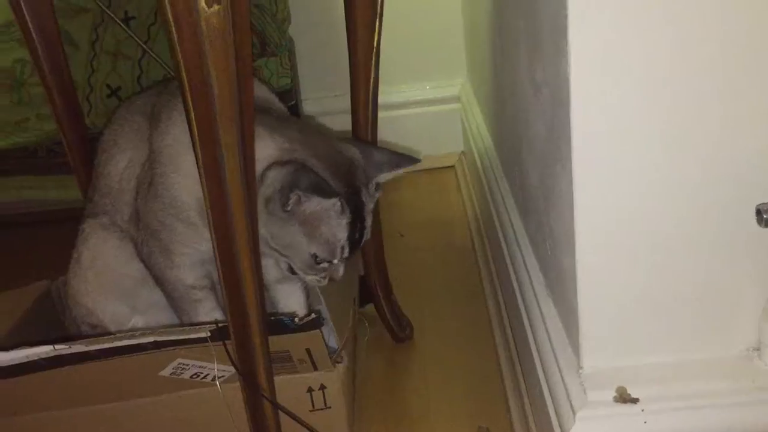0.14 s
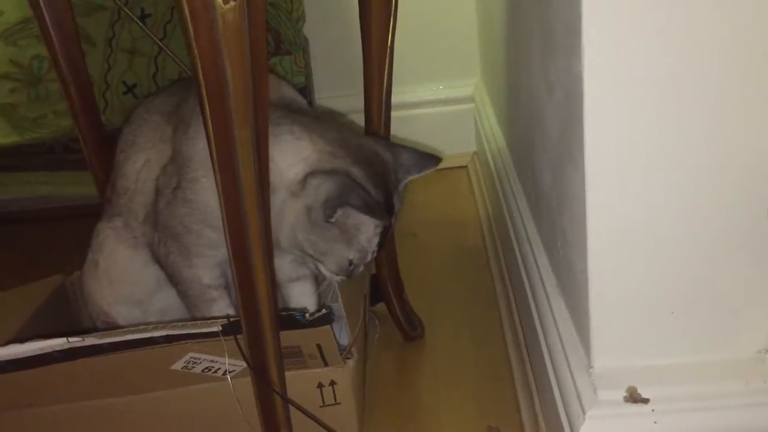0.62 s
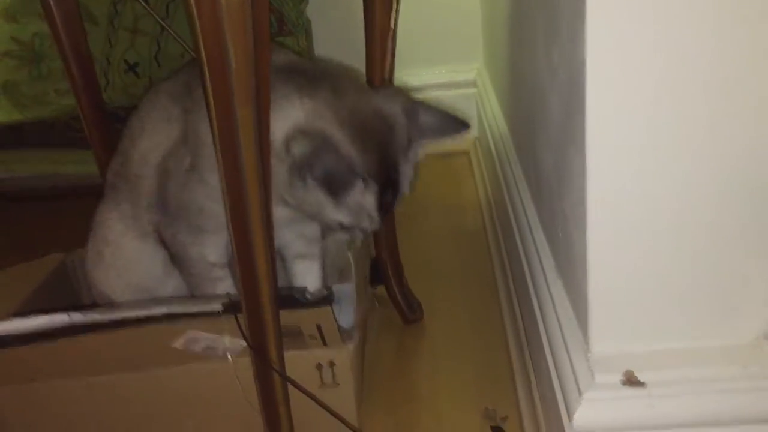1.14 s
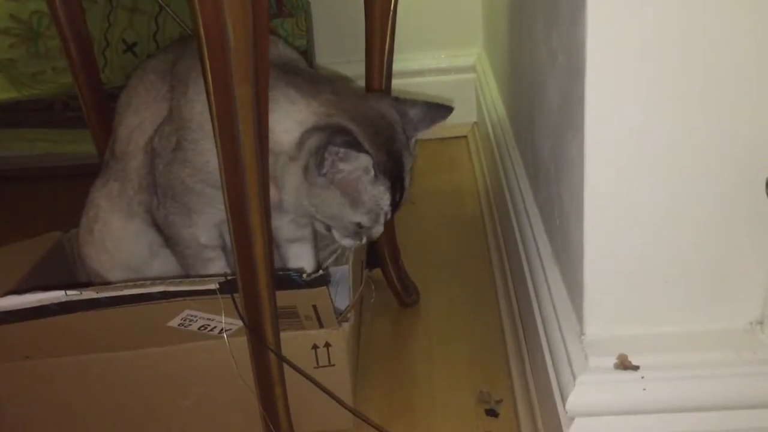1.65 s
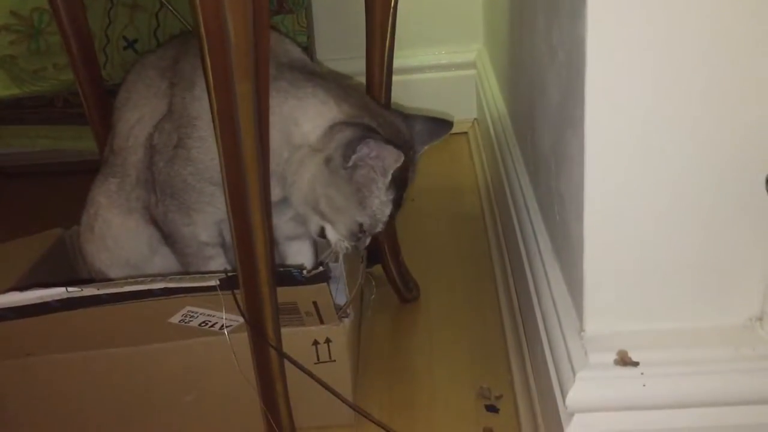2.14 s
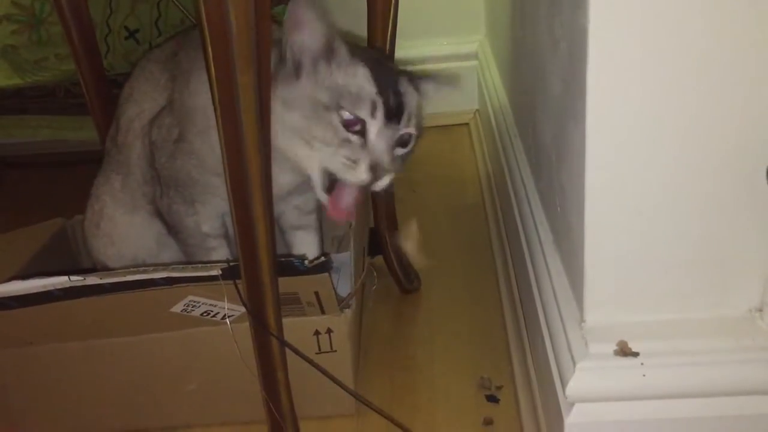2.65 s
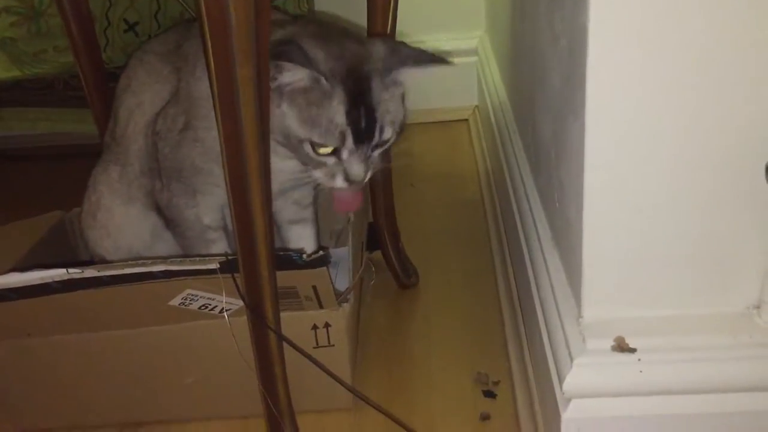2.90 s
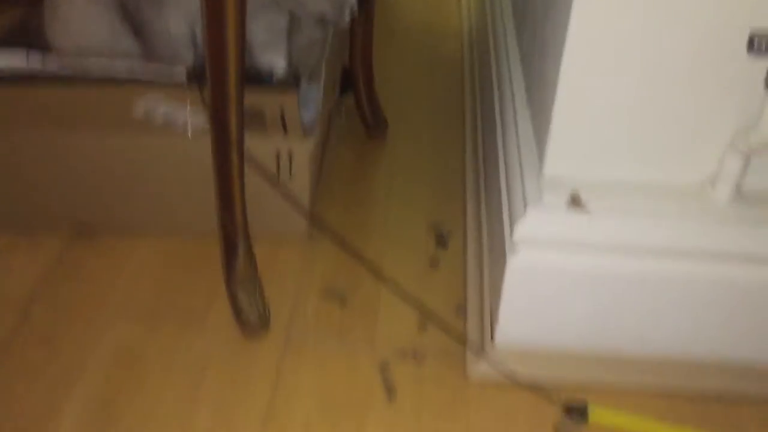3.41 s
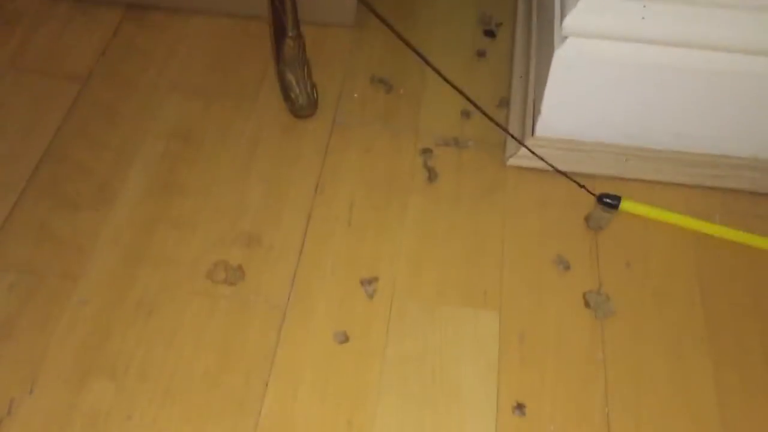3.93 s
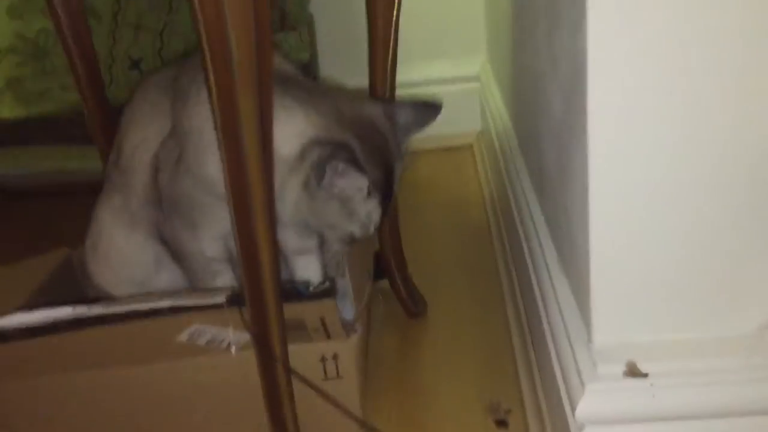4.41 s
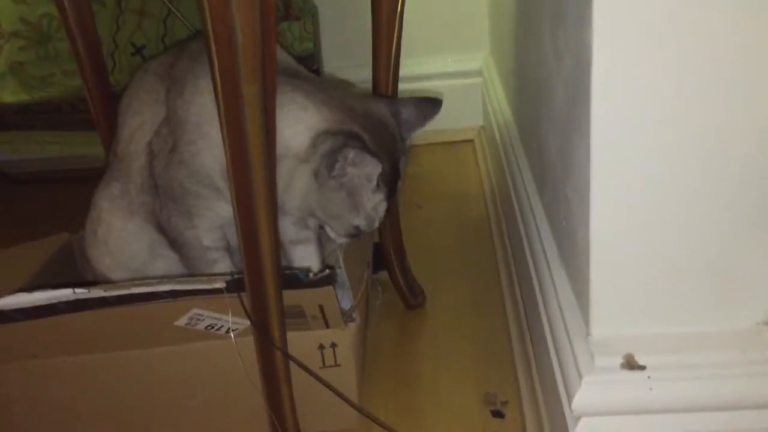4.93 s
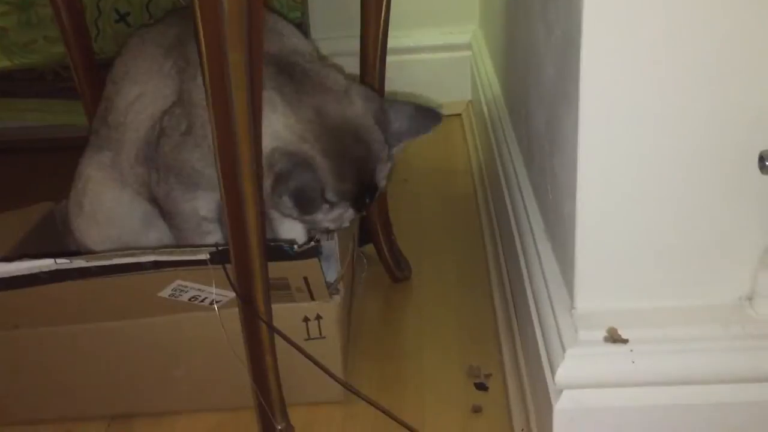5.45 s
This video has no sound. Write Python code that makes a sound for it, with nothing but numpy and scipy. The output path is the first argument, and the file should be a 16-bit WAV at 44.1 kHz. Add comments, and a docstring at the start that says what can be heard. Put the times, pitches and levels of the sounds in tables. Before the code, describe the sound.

Close, dry sounds of teeth on corrugated board: light papery crackle first, then sharper woody snaps with brief hollow ringing. After a short lull, denser tearing and thumping peaks about halfway through. It thins to a few ticks and soft nudges over low room noise, until a hard knock starts another bout of bites and ripping. Small indoor room, modest microphone.

```python
"""A cat bites and tugs at the flap of a corrugated cardboard box in a small quiet room, over faint rumble and hiss.
A jolt opens; to 2.75 s tears, bites, ticks, nudges and two-panel rings come in busy bouts, with a pause
from 1.3 to 1.75 s, then thin out. A faint rustle passes at 3.55 s; from 4.7 s biting and tearing return until 5.6 s.
Shaped noise bursts and clumped, uneven fibre noise drive resonances of walls, hollow and paper; decaying noise
adds the room."""
import sys
import numpy as np
from scipy import signal
from scipy.fft import rfft, irfft, next_fast_len
from scipy.io import wavfile
from scipy.ndimage import uniform_filter1d, map_coordinates

SR = 44100
rng = np.random.default_rng(int(sys.argv[2]) if len(sys.argv) > 2 else 0)


def bounce(signal):
    """Save signal as a 16-bit WAV file at the path given by the first command-line argument."""
    frames = np.transpose(np.atleast_2d(signal))
    limited = np.clip(frames, -1, 1)
    pcm = np.round(limited * 32767).astype(np.int16)
    wavfile.write(sys.argv[1], SR, pcm)


def makeup_ratio(level_db):
    """Linear amplitude ratio for a level in decibels (20 dB per factor of ten)."""
    decades = np.asarray(level_db, float) / 20
    return 10 ** decades


N = 245107
SPAN = 8192  # samples for one event

# bites and snaps: (time [s], knock level [dB], crackle over knock [dB], favoured pitch of the gripped flap [Hz])
BITE_EVENTS = [(0.137, -38.5, 3, 1170), (0.16, -45, -14, 1150), (0.288, -54, 5, 1000),
               (0.314, -48, -9, 504), (0.377, -65, -8, 910), (0.43, -42.5, -0.5, 1860),
               (0.445, -47, 3, 1060), (0.488, -46, -11, 1750), (0.54, -43, -13, 1200),
               (0.553, -42.5, -3.5, 1140), (0.614, -46, -9, 1130), (0.657, -39.5, -18, 523),
               (0.669, -32, -6, 540), (0.69, -37, -5, 517), (0.702, -41, -1, 530),
               (0.778, -31.5, -14.5, 587), (0.801, -49, -2, 533), (0.825, -40.5, -15, 510),
               (0.843, -37, -24, 880), (1.033, -26.5, -20, 600), (1.049, -58, -25, 1200),
               (1.164, -41, -4.5, 1310), (1.178, -33, -12, 1120), (1.2269, -28, -40, 630),
               (1.26, -40.5, -41, 530), (1.748, -56.5, -8, 1340), (1.8415, -30, -25, 730),
               (2.045, -34, -5.5, 705), (2.058, -37.5, -10, 1060), (2.092, -30.5, -6.5, 1070),
               (2.155, -46, -4, 1500), (2.167, -41, -3, 505), (2.227, -39, -3.5, 1670),
               (2.255, -36.5, -4.5, 553), (2.348, -41, -18, 1170), (2.386, -47, -1, 560),
               (2.477, -37, -3, 550), (2.493, -36.5, -6.5, 1080), (2.525, -32, -17, 574),
               (2.535, -32.5, -9, 550), (2.549, -24, -11.5, 1090), (2.555, -29.5, -16, 1150),
               (2.574, -39.5, -3, 1010), (2.619, -23.5, -24.5, 617), (2.679, -33, -42, 670),
               (2.72, -45.5, -13, 670), (3.879, -68, 4, 1260), (4.686, -32.5, -29, 670),
               (4.757, -46.5, -8, 520), (4.771, -52, -3.5, 1600), (4.794, -23, -22.5, 670),
               (4.859, -34, -21, 1050), (5.008, -31.5, -6, 1050), (5.022, -36, -22, 720),
               (5.076, -34.5, -5.5, 1160), (5.094, -37.5, -6, 483), (5.19, -45, -8, 510),
               (5.201, -41.5, -2.5, 716), (5.238, -47, -9, 1310), (5.25, -46, 2, 1120),
               (5.304, -47, -1, 530), (5.392, -55, 5, 550), (5.42, -53, 0, 1790), (5.439, -51.5, -8, 1340),
               (5.511, -54.5, -2, 1090), (5.531, -51, 1, 1100)]
# box wall resonances: (frequency [Hz], width [Hz], level [dB])
WALL_MODES = [(557.7, 39, -1.5), (670, 74, -2.5), (812, 92, -4), (961, 80, -1), (1120, 108, -1.5),
              (1279, 73, -1.5), (1389, 61, -3.5), (1588, 94, -4), (1817, 84, -2), (2138, 120, -7.5),
              (2327, 92, -7), (2525, 101, -7.5), (2793, 94, -11), (3037, 112, -9), (3626, 360, -14.5),
              (4200, 110, -20), (4490, 67, -17.5), (5550, 1440, -18), (7130, 2730, -22)]
# air and panels of the hollow box: (frequency [Hz], width [Hz], level [dB])
HOLLOW_MODES = [(70.4, 100, -12), (99.3, 60.4, -1), (125, 25.7, 1), (203.4, 52, -5), (245.5, 36, -2),
                (347.4, 44, -0.5), (403.8, 32.5, -1), (494, 88, -1)]
# thin paper layers: (frequency [Hz], width [Hz], level [dB])
PAPER_MODES = [(4260, 310, -3.5), (5310, 400, -8.5), (6670, 260, -8), (8170, 480, -3), (8840, 1900, 0),
               (9830, 1600, 1.5), (11130, 370, 2), (12040, 570, 0.5), (13370, 380, 2.5), (14800, 910, -4),
               (14200, 310, -16), (15300, 720, -7)]


def unit(x):
    """Scaled to rms 1."""
    return x / np.sqrt(np.mean(x ** 2) + 1e-20)


def peaked(x):
    """Scaled so that its loudest 2 ms have the rms of a sine of peak 1."""
    return x / np.sqrt(2 * np.max(uniform_filter1d(x * x, size=88)))


def along(points, hz):
    """(Hz, value) points interpolated on a log frequency axis."""
    f, v = np.transpose(points)
    return np.interp(np.log(hz + 1), np.log(f + 1), v)


def wobble(rate_hz):
    """A smooth random curve, rate_hz knots a second."""
    knots = rng.standard_normal(int(N * rate_hz / SR) + 4)
    return map_coordinates(knots, [np.arange(N) * rate_hz / SR])


def filtered(x, response):
    """x through a complex response of frequency."""
    m = next_fast_len(len(x) + 8192)
    return irfft(rfft(x, m) * response(np.fft.rfftfreq(m, 1 / SR)), m)[:len(x)]


def body(modes, scatter_db=0):
    """Causal sum of resonances; scatter_db weights them anew for each contact point."""
    centre, width, db = np.transpose(modes)[:, :, None]
    sign = (-1.) ** np.arange(len(modes))[:, None]
    gain = makeup_ratio(db + scatter_db * rng.standard_normal(db.shape)) * sign

    def response(f):
        damping = 1j * f * width
        return np.sum(gain * damping / (centre * centre - f * f + damping), axis=0)
    return response


def favour(f, hz, octaves, db):
    """Where the box is touched decides which modes speak: a gain bump round hz."""
    return makeup_ratio(db * np.exp(-(np.log2((f + 1) / hz) / octaves) ** 2))


def fibres(size, spiky_db):
    """Noise whose samples have long-tailed sizes: many small breaks, a few big ones."""
    return rng.standard_normal(size) * makeup_ratio(spiky_db * rng.exponential(size=size))


def patchy(x, depth_db):
    """The tear moves along the flap, so its colour shifts in patches about 500 Hz by 30 ms."""
    z = signal.stft(x, nperseg=256)[2]
    field = uniform_filter1d(rng.standard_normal(z.shape), size=3, axis=0)
    field = uniform_filter1d(field, size=10, axis=1)
    return unit(signal.istft(z * makeup_ratio(depth_db * unit(field)), nperseg=256)[1][:N])


def hush():
    """Room rumble and microphone hiss: coloured noise, its level wavering a little."""
    # noise spectrum: (frequency [Hz], relative level per Hz [dB])
    hush_colour = [(15, -72), (25, -7), (53, 3), (149, -5), (191, -8), (237, -10), (319, -12), (386, -12.5),
                   (418, -14), (681, -19), (893, -18.5), (1380, -21), (1710, -19.5), (3650, -23.5),
                   (16200, -31)]
    noise = unit(filtered(rng.standard_normal(N), lambda hz: makeup_ratio(along(hush_colour, hz))))
    return makeup_ratio(-66.5 + 0.6 * wobble(3.74)) * noise


def jolts():
    """A blunt blow and a ragged shove thump the hollow, at jolts of the whole box and at every bite."""
    # jolts: (time [s], level [dB], favoured pitch [Hz])
    jolt_events = [(0.002, -34.5, 140), (0.14, -46.5, 404), (0.305, -41.5, 375), (0.325, -46, 122),
                   (0.545, -37, 340), (0.68, -37, 350), (0.785, -38, 290), (0.916, -40.5, 347),
                   (1.049, -44, 110), (1.163, -39, 260), (1.171, -29, 272), (1.193, -39, 95),
                   (1.24, -42, 100), (1.847, -39, 100), (1.948, -36.5, 334), (1.955, -42, 119),
                   (1.974, -32.5, 120), (1.993, -38.5, 120), (2.047, -44, 110), (2.091, -32.5, 260),
                   (2.164, -34, 250), (2.253, -32.5, 260), (2.381, -37, 332), (2.531, -21, 224),
                   (2.553, -22.5, 404), (2.561, -23.5, 100), (2.574, -35, 100), (2.905, -49, 204),
                   (3.878, -54.5, 275), (4.191, -46, 126), (4.203, -49.5, 328), (4.767, -31.5, 117),
                   (4.79, -31, 100), (4.869, -31, 133), (4.874, -31.5, 370), (5.076, -27, 220),
                   (5.095, -30, 179), (5.175, -46, 141), (5.291, -41.5, 316)]
    thump_db, thump_hz, thump_s = -4, 351, 0.0019  # at bites: over the knock, pitch, push decay
    out, t = np.zeros(N + SPAN), np.arange(SPAN) / SR
    hollow = body(HOLLOW_MODES)
    pushes = [(s, db, hz, 1 / hz) for s, db, hz in jolt_events]  # decay of one period
    pushes += [(s, db + thump_db, thump_hz, thump_s) for s, db, *_ in BITE_EVENTS]
    for s, db, hz, decay_s in pushes:
        shove = (1 - np.exp(-t / 0.004)) * np.exp(-t / decay_s) * rng.standard_normal(SPAN)
        blow = np.exp(-((t - 0.0022) / 0.00096) ** 2)
        push = unit(shove) + 0.38 * unit(blow)
        thump = filtered(push, lambda f: hollow(f) * favour(f, hz, 0.54, 12.2))
        out[round(s * SR):][:SPAN] += makeup_ratio(db) * peaked(thump)
    return out[:N]


def room(x):
    """Decaying noise as echo: each frequency dies at its own speed; a new tail every 0.19 s."""
    # reverberation: (frequency [Hz], t60 [s])
    room_t60 = [(100, 0.17), (600, 0.27), (1500, 0.22), (4000, 0.2), (12000, 0.15)]
    out, step = np.zeros(N + SR), 8192
    for k in range(0, N, step):
        hz, t, z = signal.stft(rng.standard_normal(SR // 2), SR, nperseg=256)
        decay = makeup_ratio(-60 * t / along(room_t60, hz)[:, None])
        tail = signal.istft(z * decay, SR, nperseg=256)[1]
        wet = signal.fftconvolve(x[k:k + step], tail / np.linalg.norm(tail))
        out[k + 200:][:len(wet)] += wet  # 4.5 ms predelay
    return out[:N]


def tearing():
    """Fibres part in clumps of a few ms that creak in the walls, sway the hollow and rip in the paper."""
    # pull that swells and fades, one list a tear: (time [s], rip level [dB], stiff board over paper [dB])
    tears = [
        [(0.12, -65, -10), (0.145, -56.5, 6.5), (0.2, -80.5, 13)],
        [(0.275, -72, -10), (0.3, -58.5, 0.5), (0.345, -70, 5.5)],
        [(0.42, -65, 5), (0.46, -55, 1.5), (0.52, -61, 4.5), (0.56, -58.5, 7), (0.585, -66, -4),
         (0.64, -61.5, 3.5), (0.706, -58.5, 3), (0.74, -57, 3.5), (0.834, -54, 4), (0.87, -82, 9)],
        [(2.04, -65.5, 5), (2.15, -66, 6.5), (2.16, -65.5, -1), (2.215, -57.5, -1), (2.264, -52.5, 2.5),
         (2.346, -55.5, 1.5), (2.4, -54, -1), (2.464, -58, 1.5), (2.49, -46.5, 0.5), (2.55, -43.5, 3),
         (2.606, -77, 16)],
        [(5.16, -67, 1), (5.21, -62, 10), (5.235, -65.5, -0.5), (5.285, -60, 2), (5.305, -58, 3),
         (5.38, -59.5, 1.5), (5.42, -55, -1), (5.49, -61, -1.5), (5.558, -53, -13.5)],
    ]
    # the box rocks and settles: (start [s], length [s], level [dB], creak over sway [dB])
    rocking = [(0.846, 0.18, -60, -11), (1.954, .09, -57.5, -11.5), (2.59, 0.17, -49.5, -24),
               (4.193, .15, -70, -17), (4.76, 0.23, -55, -8.5)]
    settle_db = 8  # lost over one rocking
    snap_db, snaps_per_s = -9.5, 250  # single fibres, over the rip
    t, out = np.arange(N) / SR, np.zeros(N)
    clumps_db = 2.2 * wobble(45) + 2.2 * wobble(220)

    creak = filtered(makeup_ratio(clumps_db) * fibres(N, spiky_db=1.6), body(WALL_MODES))
    creak = patchy(creak, depth_db=1.7)
    sway_db = 0.41 * clumps_db + 2.4 * wobble(24)
    sway = unit(filtered(makeup_ratio(sway_db) * rng.standard_normal(N), body(HOLLOW_MODES)))
    rip = filtered(makeup_ratio(0.86 * clumps_db) * fibres(N, spiky_db=3.5), body(PAPER_MODES))
    rip = patchy(rip, depth_db=3.5)

    walls, paper = body(WALL_MODES), body(PAPER_MODES)
    single = (rng.random(N) < snaps_per_s / SR) * fibres(N, spiky_db=1)
    snaps = unit(filtered(single, lambda f: paper(f) + makeup_ratio(-0.5) * walls(f)))
    papery = rip + makeup_ratio(snap_db) * snaps
    board = filtered(creak, lambda f: favour(f, 2400, 0.25, 1.7)) + sway

    def gate(start_s, end_s, edge_s):
        return np.clip(np.minimum(t - start_s, end_s - t) / edge_s + 1, 0, 1)

    for rows in tears:
        s, db, stiff_db = np.transpose(rows)
        tear = papery + makeup_ratio(np.interp(t, s, stiff_db)) * board
        out += gate(s[0], s[-1], 0.0065) * makeup_ratio(np.interp(t, s, db)) * tear
    for s, length_s, db, creak_db in rocking:
        level_db = db - settle_db * np.clip((t - s) / length_s, 0, 1)
        out += gate(s, s + length_s, 0.037) * makeup_ratio(level_db) * (sway + makeup_ratio(creak_db) * creak)
    return out


def bites():
    """A burst of breaking flutes knocks the walls and crackles in the paper."""
    crush_s, woody_crush_s = 0.0066, 0.0027  # decay of a papery bite; added for a fully woody snap
    bright_db, woody_bright_db = 0.28, -0.5  # per octave, likewise
    out, t = np.zeros(N + SPAN), np.arange(SPAN) / SR
    for s, db, crackle_db, hz in BITE_EVENTS:
        woody = np.clip(-crackle_db / 30, 0, 1)
        rise_s = 0.0035 * makeup_ratio(0.6 * np.clip(crackle_db, -30, 0))  # papery bites swell, woody snaps start faster
        force = (1 - np.exp(-t / rise_s)) * np.exp(-t / (crush_s + woody_crush_s * woody))
        walls = body(WALL_MODES, scatter_db=0.44)
        slope_db = bright_db + woody_bright_db * woody

        def grip(f):
            tilt = makeup_ratio(slope_db * np.log2(np.clip(f, 300, 8000) / 1200))
            return walls(f) * favour(f, hz, 0.25, 9.9) * tilt

        breaks = force * fibres(SPAN, spiky_db=2.5)
        breaks[:7] += 7 * woody * np.hanning(7)  # a woody snap opens with one hard crack
        knock = peaked(filtered(breaks, grip))
        swell = (1 - np.exp(-t / (0.5 * rise_s))) * force  # the paper gives way a moment later
        paper = body(PAPER_MODES, scatter_db=4.0)
        crackle = peaked(filtered(swell * fibres(SPAN, spiky_db=2.5), paper))
        out[round(s * SR):][:SPAN] += makeup_ratio(db) * (knock + makeup_ratio(crackle_db) * crackle)
    return out[:N]


def ticks():
    """A single tough fibre parts: a very short break, heard mostly in the paper."""
    # ticks: (time [s], level [dB])
    tick_events = [(0.208, -56), (0.5925, -40.5), (0.6725, -38), (0.846, -36), (0.9338, -60),
                   (1.949, -52.5), (1.9769, -53), (1.9944, -55), (2.0147, -54), (2.396, -40),
                   (2.4224, -43.5), (2.5523, -27), (2.9624, -40), (3.1208, -69)]
    out, t = np.zeros(N + SPAN), np.arange(1024) / SR
    for s, db in tick_events:
        paper = body(PAPER_MODES, scatter_db=3.5)
        walls = body(WALL_MODES, scatter_db=10.0)
        snap = np.exp(-t / 0.0012) * fibres(len(t), spiky_db=3.0)
        tick = filtered(snap, lambda f: paper(f) + makeup_ratio(-7.0) * walls(f))
        out[round(s * SR):][:len(t)] += makeup_ratio(db) * peaked(tick)
    return out[:N]


def nudges():
    """A soft, short rub of paw or muzzle wakes one region of the wall modes."""
    # nudges: (time [s], level [dB], favoured pitch [Hz])
    nudge_events = [(0.738, -51, 515), (0.905, -45, 900), (0.924, -46.5, 566), (1.152, -43, 1140),
                    (1.949, -40.5, 595), (1.979, -42.5, 510), (2.702, -41, 630), (2.745, -49, 610),
                    (2.977, -60.5, 1570), (4.192, -49.5, 1110), (4.255, -57, 600), (4.815, -47, 570),
                    (4.861, -35, 560), (4.878, -41.5, 915), (1.89, -52, 695), (2.655, -44, 650)]
    rise_s, decay_s = 0.0013, 0.0093
    out, t = np.zeros(N + SPAN), np.arange(SPAN) / SR
    rub = (1 - np.exp(-t / rise_s)) * np.exp(-t / decay_s)
    for s, db, hz in nudge_events:
        walls = body(WALL_MODES, scatter_db=2.5)
        tap = filtered(rub * fibres(SPAN, spiky_db=2.5), lambda f: walls(f) * favour(f, hz, 0.51, 21))
        out[round(s * SR):][:SPAN] += makeup_ratio(db) * peaked(tap)
    return out[:N]


def releases():
    """The teeth let go; two freed panels beat unevenly against each other as they die."""
    # releases: (time [s], level [dB])
    release_events = [(1.036, -41), (1.232, -45), (2.625, -51), (2.683, -48.5)]
    t60_s, rise_s = 0.22, 0.012
    out, t = np.zeros(N + SR // 2), np.arange(SR // 2) / SR
    for s, db in release_events:
        panels = np.zeros(len(t))
        for hz, _, mode_db in WALL_MODES[:2]:
            level = makeup_ratio(mode_db + 3.2 * wobble(40)[:len(t)])
            phase = 2 * np.pi * hz * t + 0.8 * wobble(26)[:len(t)]
            panels += level * np.sin(phase)
        out[round(s * SR):][:len(t)] += makeup_ratio(db - 60 * t / t60_s) * (1 - np.exp(-t / rise_s)) * panels
    return out[:N]


def rustle():
    """Grainy cloth-like noise that swells and fades."""
    # the rustle: (middle [s], half length [s], level [dB])
    rustle_event = (3.55, 0.068, -64.5)
    # noise spectrum: (frequency [Hz], relative level per Hz [dB])
    rustle_colour = [(300, -8), (1000, 2.5), (2500, 3), (5000, -6.5), (9000, -24)]
    middle_s, half_s, db = rustle_event
    cloth = filtered(fibres(N, spiky_db=3.0), lambda hz: makeup_ratio(along(rustle_colour, hz)))
    swell = np.exp(-((np.arange(N) / SR - middle_s) / half_s) ** 2)
    return makeup_ratio(db) * swell * patchy(cloth, depth_db=2.5)


def scene():
    """The box, its echo, the rustle and the noise floor."""
    box = jolts() + tearing() + bites() + ticks() + nudges() + releases()
    return (hush() + box + makeup_ratio(-10.5) * room(box) + rustle())[None]


def top_cut(x):
    """Nothing passes above the cut-off."""
    return signal.sosfilt(signal.butter(12, 16480, fs=SR, output="sos"), x)


def record(dry):
    """The microphone loses the deep bass and the top."""
    bass_hz, top_hz = 33, 15750

    def microphone(hz):
        return (1j * hz / (1j * hz + bass_hz)) ** 2 / (1 + (hz / top_hz) ** 200)

    return top_cut(filtered(dry[0], microphone)[None])


dry = scene()
out = record(dry)
bounce(out)
```